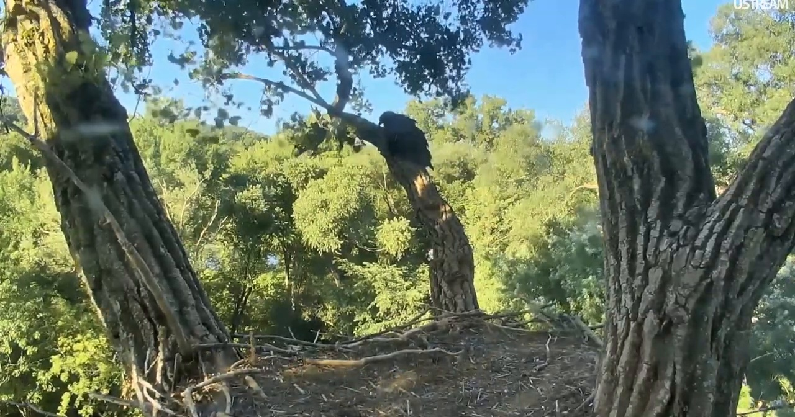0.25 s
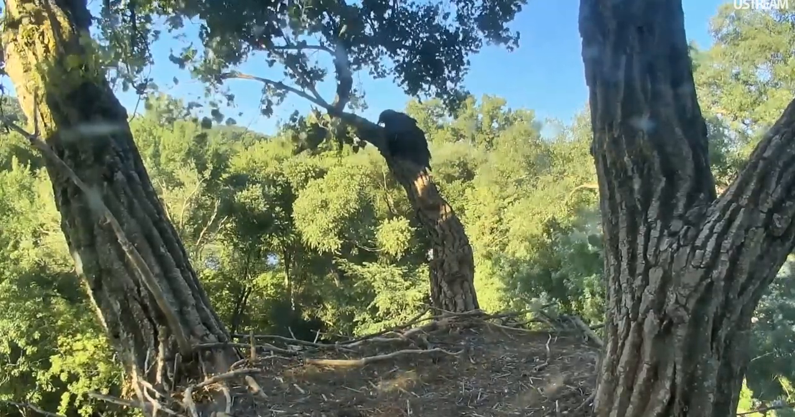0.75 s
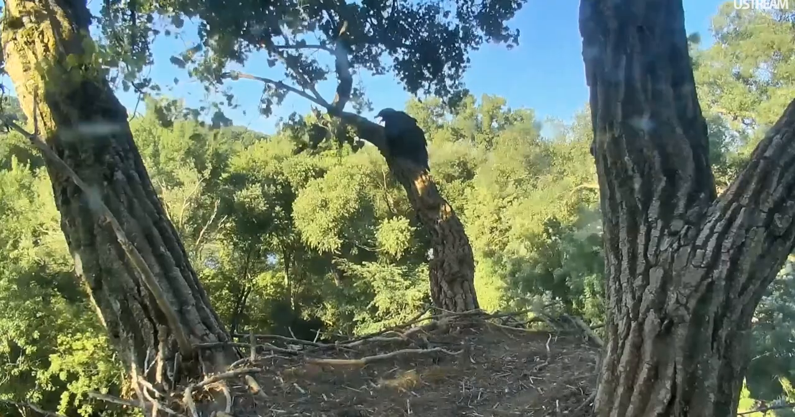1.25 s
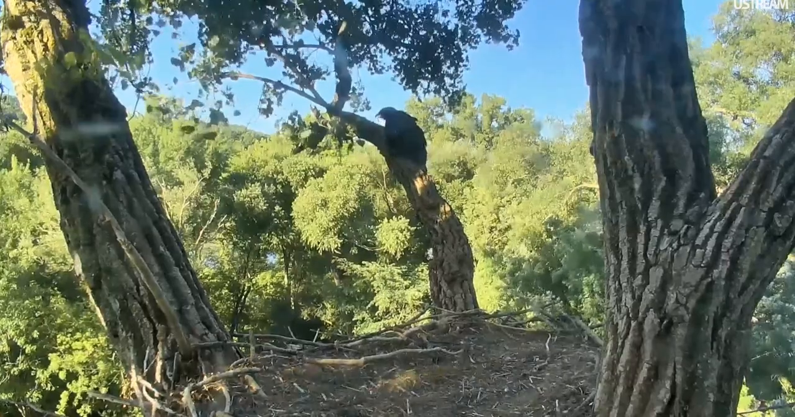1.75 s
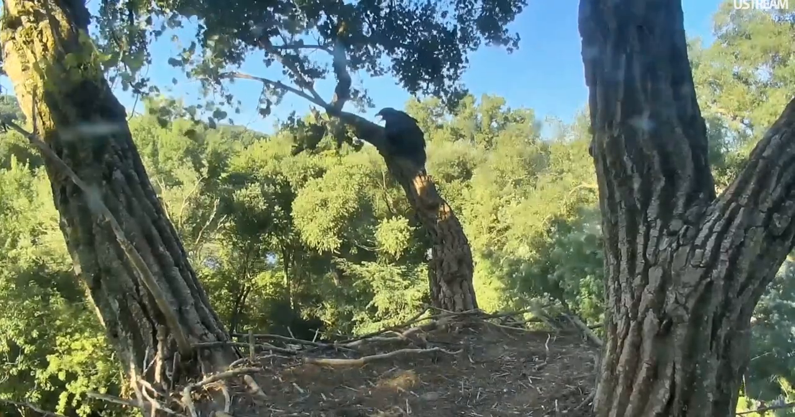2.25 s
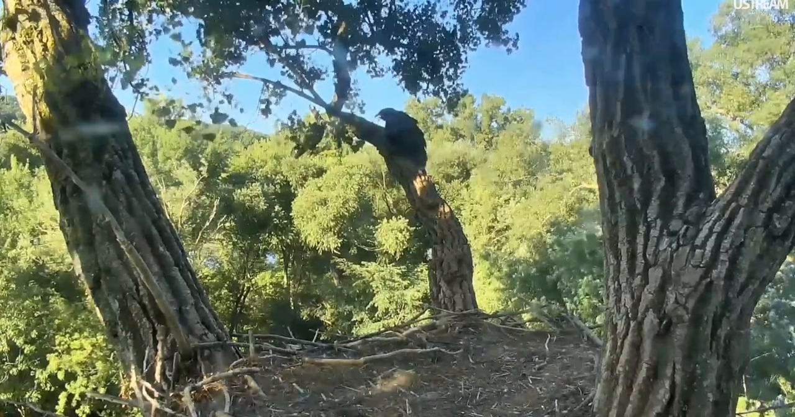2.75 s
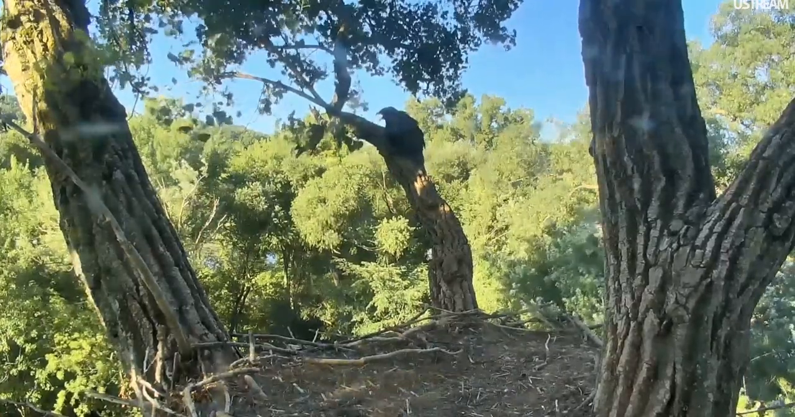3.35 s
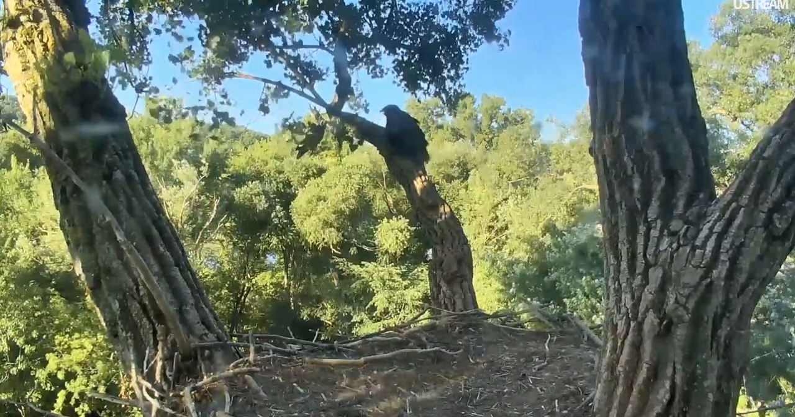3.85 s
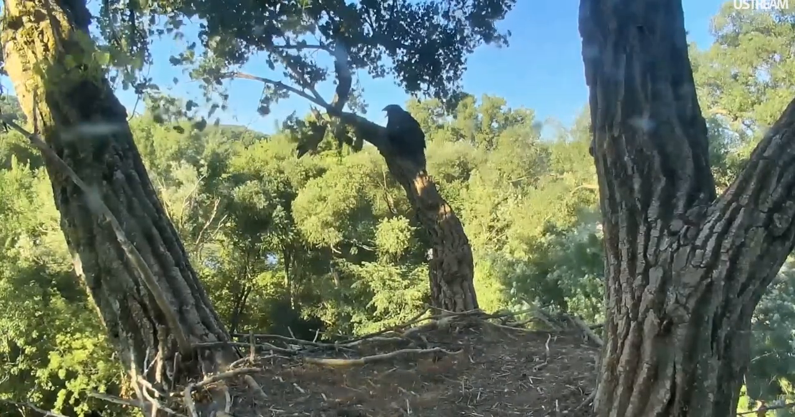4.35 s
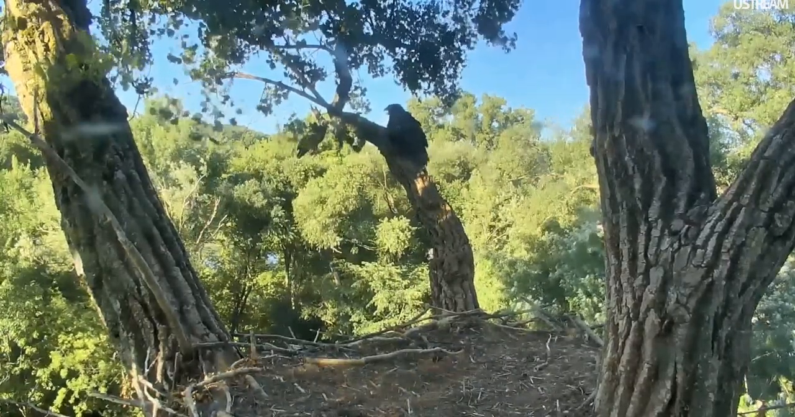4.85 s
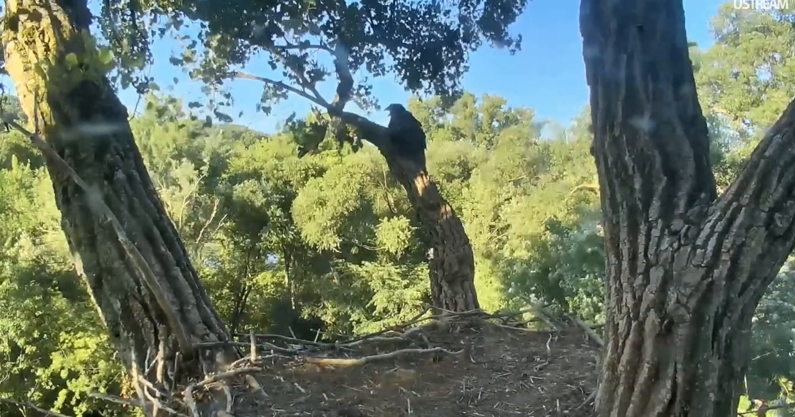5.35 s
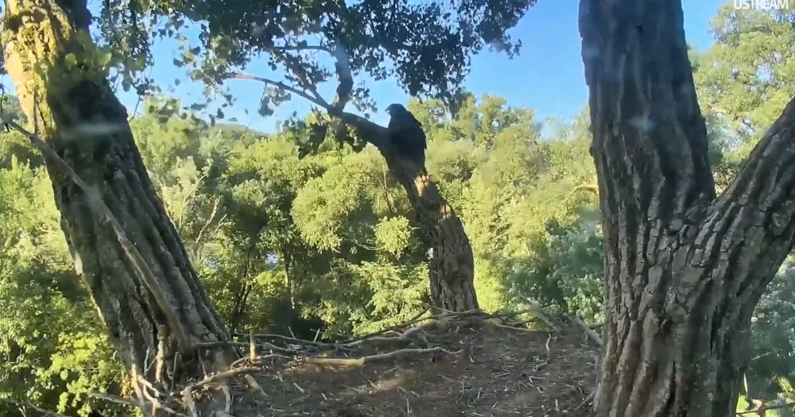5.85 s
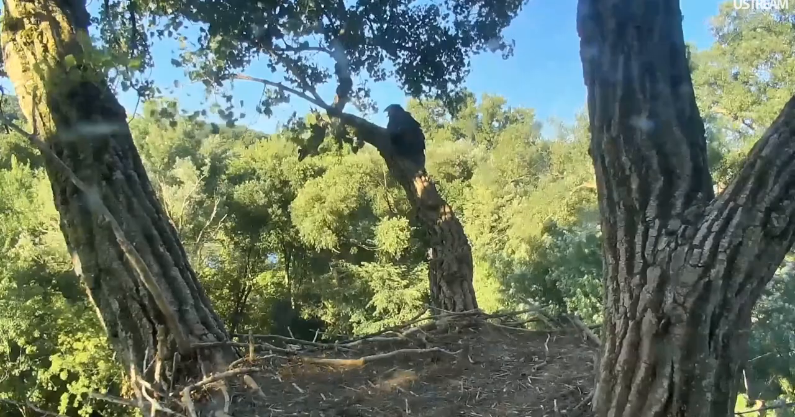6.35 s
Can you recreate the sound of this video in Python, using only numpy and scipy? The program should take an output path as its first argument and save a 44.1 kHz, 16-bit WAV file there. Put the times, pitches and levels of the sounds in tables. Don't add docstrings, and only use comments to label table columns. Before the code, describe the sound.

A constant soft rush of far air and road noise, slightly hollow, drifts gently over a faint low hum throughout. Young eagles call in front, with short echoes from trees. Tiny sharp chips sweep downward at 0.14, 0.87, 1.5 (loudest), 2.1, 2.8, 3.5, 4.2, 4.9 and 5.8 seconds, the last two longer and lower. Thin, fluttering squeals answer at 0.4, 1.75, 2.3 and 3.0, the last strongest with a long rise; fainter trailing ones follow at 1.1, 3.7, 4.4 and 5.2. Hoarse peeps cluster around 1.7 to 1.9, and a bright rising pip jumps out at 2.3. Two dull twig knocks come at 2.2. Low raspy yelps sound at 4.4 and, stronger, 5.2, with a small grunt at 5.8. A faint squeal and peep end it from 6.1. The cheap microphone gives calls glassy, metallic high images.

```python
import sys
import numpy as np
from scipy import signal
from scipy.fft import rfft, irfft, next_fast_len
from scipy.io import wavfile
from scipy.ndimage import uniform_filter1d, map_coordinates

SR = 44100
rng = np.random.default_rng(int(sys.argv[2]) if len(sys.argv) > 2 else 0)


def how_loud(loudness_db):
    steps = np.asarray(loudness_db, float) / 20
    return 10 ** steps


def persist_wave(psi):
    counts = np.round(np.clip(psi, -1, 1) * 32767).astype(np.int16)
    wavfile.write(sys.argv[1], SR, np.atleast_2d(counts).T)


N = 291501
CAMERA_HZ = 8000

# (frequency [Hz], density [dB per Hz])
FAR_AIR = [(15, -62), (25, -35), (75, -26.5), (330, -25.5), (920, -21), (1400, -17), (2200, -13),
           (3400, -11), (3990, -17.5)]
# (time [s], level [dB])
FAR_AIR_DRIFT = [(0.0, -37), (2.401, -35.7), (4.0, -36.5), (6.61, -35.5)]
# (frequency [Hz], width [Hz], height over the rest [dB])
HOUSING_RING = (1655, 245, 14.67)
# (frequency [Hz], width [Hz], level [dB])
FAR_HUM = [(83.6, 3.8, -73.5)]
# (frequency [Hz], time to fall 60 dB [s])
TREE_DECAY = [(1500, 0.031), (2800, 0.31), (4000, 0.36)]
# (start [s], length [s], body level [dB], hook level [dB], last pitch [Hz])
CHIP_CALLS = [
    (0.139, .037, -32, -39, 2500),
    (0.873, .027, -24.5, -26, 2720),
    (1.511, 0.032, -17, -22, 2560),
    (2.118, .036, -23.5, -29, 2740),
    (2.777, .024, -25.5, -28, 3144),
    (3.493, .028, -25, -32.5, 2635),
    (4.168, .028, -31.5, -35.5, 2830),
    (4.916, .043, -33, -32, 2290),
    (5.756, .041, -32.5, -31, 2217),
]
# (body peak as share of length [1], echo level [dB])
CHIP_FACING = [
    (0.32, -0.5),
    (0.23, -5.5),
    (0.27, -10.5),
    (0.25, -8),
    (0.33, -1),
    (0.47, -4),
    (0.49, -4.5),
    (0.27, -2.5),
    (0.37, -2),
]
# (start [s], held [s], level [dB], first pitch [Hz], held pitch [Hz])
SQUEAL_CALLS = [
    (0.380, .11, -28, 3660, 3935),
    (1.75, 0.079, -30, 3840, 3827),
    (2.335, 0.048, -36.5, 3730, 3880),
    (3.010, .117, -24.5, 2800, 3750),
    (6.165, 0.097, -40, 3880, 3910),
]
# (start [s], held [s], level [dB], first pitch [Hz], held pitch [Hz])
HOARSE_PEEPS = [ (1.06, 0.045, -41.5, 3100, 3070), (1.7, .016, -33, 2550, 2950),
                (1.7, 0.01, -36, 3100, 2910), (1.682, 0.046, -33, 3840, 3800),
                (1.838, .026, -39.5, 3880, 3800), (1.866, 0.029, -39.5, 3810, 3720),
                (1.91, 0.018, -41.5, 3400, 3890), (1.7, 0.04, -47.5, 3400, 3200),
                (3.5, 0.033, -42, 3700, 3300), (6.315, .018, -43, 3900, 3910),
                (2.06, 0.013, -42, 2900, 3350), (3.15, .028, -39, 2500, 3790),
                (3.19, 0.058, -47, 3780, 3790), (3.265, 0.021, -38, 3780, 3780),
                (0.51, .055, -40, 3920, 3900)]
# (start [s], held [s], level [dB], first pitch [Hz], held pitch [Hz])
TRAILING_SQUEALS = [
    (1.102, .08, -36.5, 3690, 3840),
    (3.74, 0.074, -38.5, 3810, 3940),
    (4.444, 0.15, -36, 3776, 3913),
    (5.236, 0.095, -36, 3610, 3900),
]
# (start [s], held [s], level [dB], first pitch [Hz], held pitch [Hz])
CLEAR_PIPS = [
    (2.105, .013, -31, 3620, 4020),
    (2.315, .017, -22, 2620, 3480),
    (2.318, .014, -34, 2200, 2240),
    (3.717, .02, -34, 3120, 3340),
    (3.748, .02, -31, 3310, 3330),
    (6.128, .036, -41, 3200, 3850),
]
# (time [s], peak level [dB], frequency [Hz])
TWIG_TAPS = [
    (2.188, -38, 664),
    (2.266, -40.5, 380),
]
# (start [s], held [s], level [dB], first pitch [Hz], held pitch [Hz])
LOW_YELPS = [
    (4.404, .036, -28, 1380, 1780),
    (4.443, .026, -30, 1700, 1740),
    (5.192, .033, -24, 1640, 1720),
    (5.229, .018, -23, 1700, 1830),
    (5.292, .012, -31, 1650, 1700),
    (5.793, .008, -35, 1660, 1500),
]
# (attack [s], crest as share of hold [1], swell [dB], pitch settling [s], pitch creep [Hz/s],
# let-go drop [dB], let-go time [s], fade [dB/s])
SQUEAL_FORM = (.009, .72, 4, .018, 450, 15, .014, 110)
PEEP_FORM = (.005, .5, 1.5, .010, 0, 18, .008, 250)
TRAIL_FORM = (.007, 0, 9, .015, 0, 16, .02, 250)
YELP_FORM = (.007, .4, 2, .011, 0, 25, .005, 600)
# (frequency [Hz], gain [dB])
TREBLE_RISE = [(1000, 1), (2000, 1.54), (3000, 1), (3600, 2), (4000, 3)]
# (frequency [Hz], density [dB per Hz])
HIGH_HISS = [(5000, 9.5), (6800, 0.5), (6950, -41), (8850, -43), (9000, -9), (15000, -19)]


def unit(x):
    return x / np.sqrt(np.mean(x ** 2) + 1e-20)


def along(points, hz):
    f, v = np.transpose(points)
    return np.interp(np.log(hz + 1), np.log(f + 1), v)


def noise(response):
    m = next_fast_len(N + 8192)
    spectrum = rfft(rng.standard_normal(m)) * response(np.fft.rfftfreq(m, 1 / SR))
    return unit(irfft(spectrum, m)[:N])


def air():
    ring_hz, ring_width, ring_db = HOUSING_RING

    def housing(f):
        offset = 2 * (f - ring_hz) / ring_width
        return np.sqrt(1 + how_loud(ring_db) ** 2 / (1 + offset ** 2) ** 1.47)

    rush = noise(lambda f: how_loud(along(FAR_AIR, f)) * housing(f) * (f < CAMERA_HZ / 2))
    times, drift_db = np.transpose(FAR_AIR_DRIFT)
    rush = rush * how_loud(np.interp(np.arange(N) / SR, times, drift_db))
    hum = sum(how_loud(db) * noise(lambda f: 1 / (1 + ((f - hz) / width) ** 2)) for hz, width, db in FAR_HUM)
    return rush + hum


def wobble(size, count):
    return map_coordinates(rng.standard_normal(count + 4), [np.arange(size) * count / SR])


def echo(x, gap):
    _, t, z = (hz_t_z := signal.stft(rng.standard_normal(SR // 2), SR, nperseg=256))
    decay = how_loud(-60 * t / along(TREE_DECAY, hz_t_z[0])[:, None])
    tail = signal.istft(z * decay, SR, nperseg=256)[1]
    tail = tail * np.clip(np.arange(len(tail)) / SR / gap, 0, 1)
    return signal.fftconvolve(x, tail / np.linalg.norm(tail))


def calls(notes, hoarse, echoes_db, lift_db, quaver, flutter_db):
    out = np.zeros(N + 2 * SR)
    for rows, rough, wet_db in zip(notes, hoarse, echoes_db):
        s, hz, *levels = np.transpose(rows)
        t = np.arange(s[0], s[-1], 1 / SR)
        weakness_db = max(levels[0]) - np.interp(t, s, levels[0])
        rough = rough * (1 + weakness_db / 16)
        pitch = np.interp(t, s, hz) * (1 + quaver * rough * wobble(len(t), count=100))
        phase = 2 * np.pi * np.cumsum(pitch) / SR
        rasp = 1 + rough * (wobble(len(t), count=500) + 1j * wobble(len(t), count=500))
        tone = sum(how_loud(np.interp(t, s, db)) * np.exp(1j * (k + 1) * phase) for k, db in enumerate(levels))
        fade = np.clip(np.minimum(t - s[0], s[-1] - t) / 0.00072, 0, 1)
        flutter = how_loud(lift_db + flutter_db * wobble(len(t), count=160))
        tone = (tone * rasp).real * fade * flutter
        wet = echo(tone, gap=0.0093)
        wet = wet * how_loud(wet_db + 2.3 * wobble(len(wet), count=220))
        first = round(s[0] * SR)
        out[first:][:len(t)] += tone
        out[first:][:len(wet)] += wet
    return out[:N]


def chip(start, length, body_db, hook_db, last_hz, body_at):
    u = np.linspace(0, 1, num=40)

    def swell(db, at, wide):
        return how_loud(db) * np.exp(-((u - at) / wide) ** 2 / 2)

    lead = swell(body_db - 10.5, body_at / 3, wide=.13)
    body = swell(body_db, body_at, wide=.13)
    hook = swell(hook_db, at=.77, wide=.085)
    pitch = last_hz + (4225 - last_hz) * (1 - u) ** 1.45
    return np.transpose([start + length * u, pitch, 20 * np.log10(lead + body + hook)])


def chips():
    body_at, facing_db = np.transpose(CHIP_FACING)
    notes = [chip(*row, at) for row, at in zip(CHIP_CALLS, body_at)]
    return calls(notes, [.06] * len(notes), facing_db, lift_db=4, quaver=0.0068, flutter_db=2.65)


def held(start, length, db, first_hz, held_hz, shape):
    attack, crest, swell_db, settle, creep, drop_db, drop, fade = shape
    hold = max(length - attack, 1e-3)
    corners = np.cumsum([0, attack, crest * hold + 1e-4, (1 - crest) * hold, drop, 12 / fade])
    corner_db = [-25, -crest * swell_db, 0, (crest - 1) * swell_db, -drop_db, -drop_db - 8]
    t = np.arange(0, corners[-1], 1e-3)
    level = db + np.interp(t, corners, corner_db)
    pitch = held_hz + (first_hz - held_hz) * np.exp(-t / settle) + creep * np.minimum(t, length)
    return np.transpose([start + t, pitch, level])


def squeals():
    kinds = [(SQUEAL_CALLS, SQUEAL_FORM), (TRAILING_SQUEALS, TRAIL_FORM),
             (HOARSE_PEEPS, PEEP_FORM), (CLEAR_PIPS, PEEP_FORM)]
    notes = [held(*row, shape) for rows, shape in kinds for row in rows]
    rasp = [.22 + .008 * (-27 - row[2]) for row in SQUEAL_CALLS]
    rasp += [.33] * len(TRAILING_SQUEALS) + [.5] * len(HOARSE_PEEPS) + [.15] * len(CLEAR_PIPS)
    return calls(notes, rasp, [-5] * len(notes), lift_db=0.5, quaver=0.032, flutter_db=2.8)


def taps():
    t = np.arange(N) / SR
    out = np.zeros(N)
    for start, db, hz in TWIG_TAPS:
        since = t - start
        decay = how_loud(db - 60 * np.maximum(since, 0) / 0.023)
        out += decay * np.sin(2 * np.pi * hz * since) * (since > 0)
    return out


def yelps():
    notes = []
    for row in LOW_YELPS:
        _, length, db, _, _ = row
        rows = held(*row, YELP_FORM)
        overtone_db = -32.5 - .4 * (db + 27) - 20 * (length < .015)
        notes.append(np.column_stack([rows, rows[:, -1] - db + overtone_db]))
    return calls(notes, [.21] * len(notes), [-8] * len(notes), lift_db=1.0, quaver=0.058, flutter_db=1.5)


def scene():
    return (air() + chips() + squeals() + taps() + yelps())[None]


def starved(x, depth_db):
    hz, _, z = signal.stft(x, SR, nperseg=1024)
    power = uniform_filter1d(abs(z) ** 2, size=12, axis=0)
    loudest = power[(hz > 3000) & (hz < 4500)].mean(0)
    keep = (power > loudest * how_loud(2 * depth_db)) | (hz < 5500)[:, None]
    return signal.istft(z * keep, SR, nperseg=1024)[1][:N]


def low_pass(x):
    return signal.sosfilt(signal.butter(12, 14980, fs=SR, output="sos"), x)


def record(dry):
    seconds = N // SR + 1
    padded = np.pad(dry[0], (0, seconds * SR - N))
    slow = signal.resample(padded, seconds * 2 * CAMERA_HZ)[::2]
    hz = np.fft.rfftfreq(seconds * SR, 1 / SR)
    u = hz / CAMERA_HZ
    images = np.fft.fft(slow)[np.arange(len(hz)) % len(slow)]
    colour = how_loud(along(TREBLE_RISE, CAMERA_HZ * abs(u - np.round(u))))
    cubic = np.sinc(u) ** 4 * (1 + (2 * np.pi * u) ** 2 / 6)
    rebuilt = irfft(images * colour * cubic, seconds * SR)[:N] * SR / CAMERA_HZ
    hiss = how_loud(-66) * noise(lambda f: how_loud(along(HIGH_HISS, f)) * (f > CAMERA_HZ / 2))
    mix = starved(rebuilt + hiss, depth_db=-41)[None]
    return low_pass(mix)


dry = scene()
out = record(dry)
persist_wave(out)
```